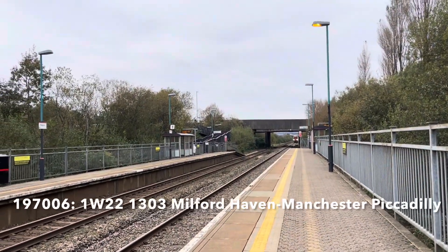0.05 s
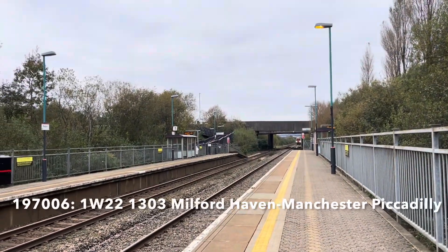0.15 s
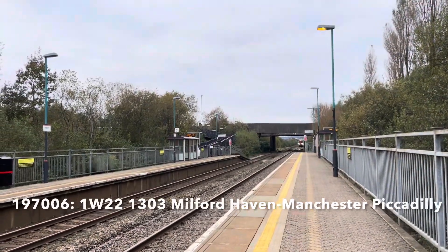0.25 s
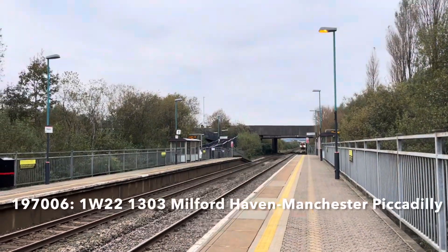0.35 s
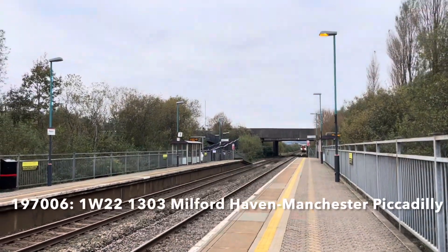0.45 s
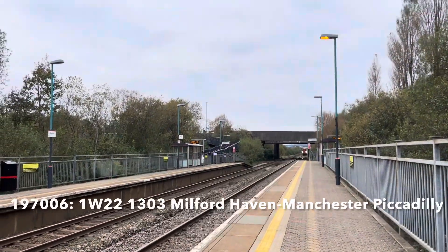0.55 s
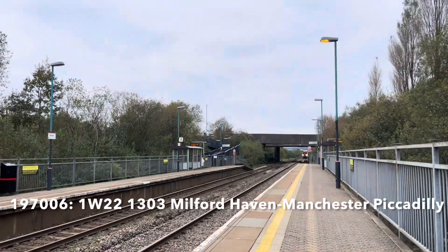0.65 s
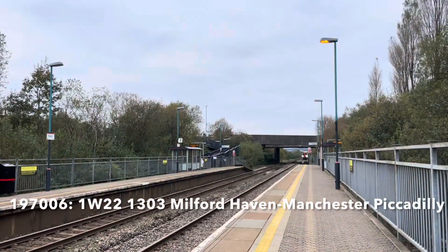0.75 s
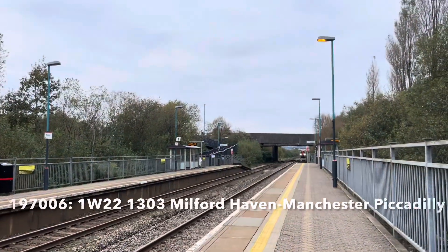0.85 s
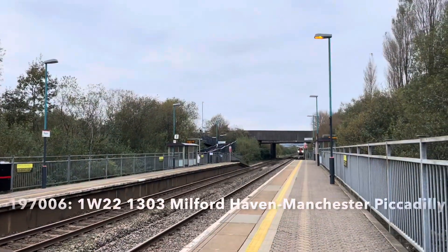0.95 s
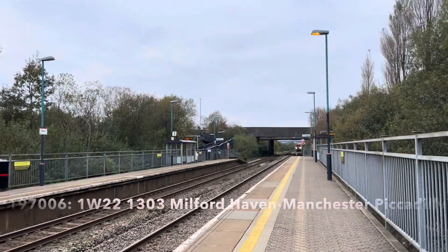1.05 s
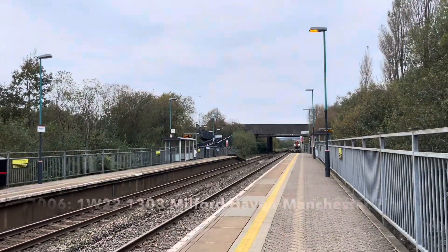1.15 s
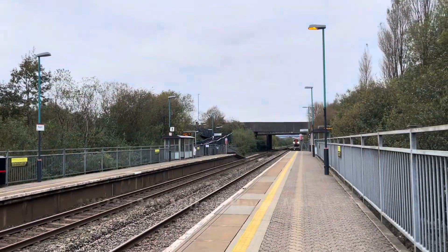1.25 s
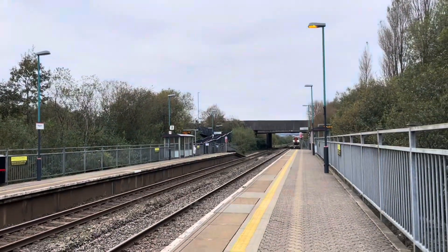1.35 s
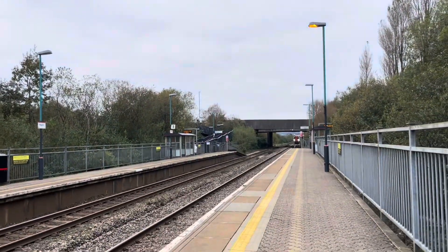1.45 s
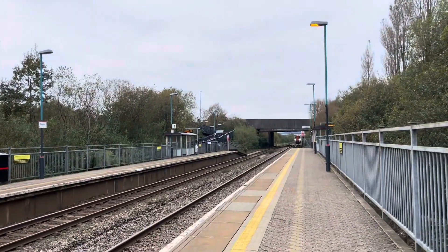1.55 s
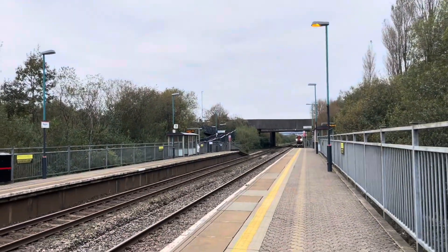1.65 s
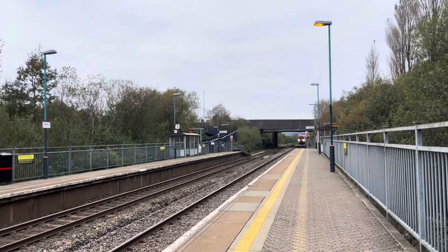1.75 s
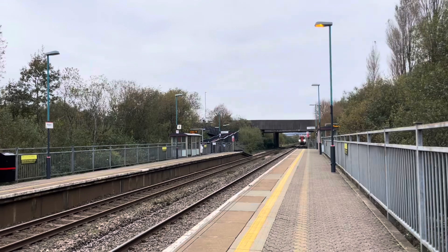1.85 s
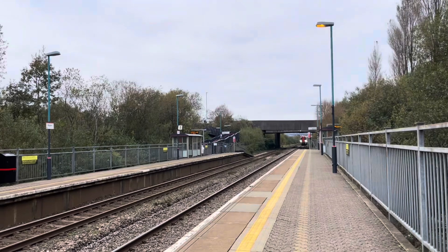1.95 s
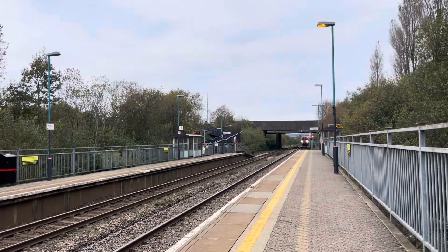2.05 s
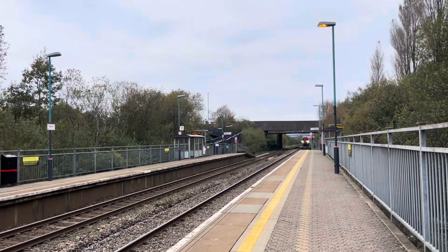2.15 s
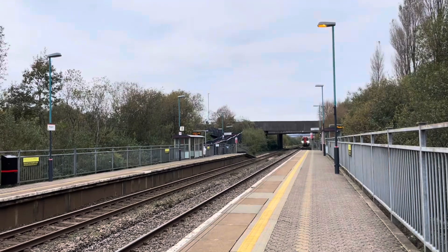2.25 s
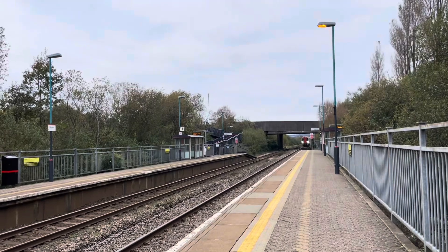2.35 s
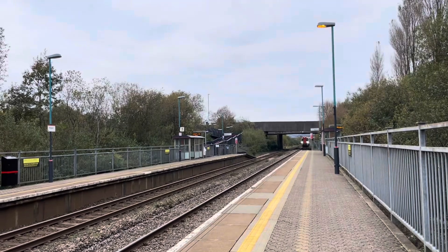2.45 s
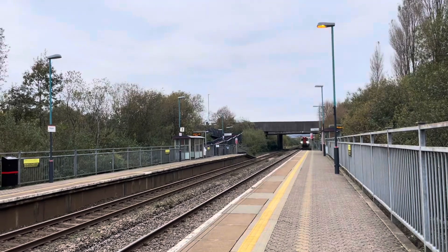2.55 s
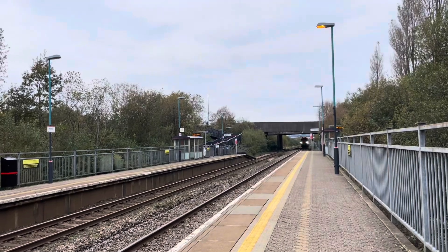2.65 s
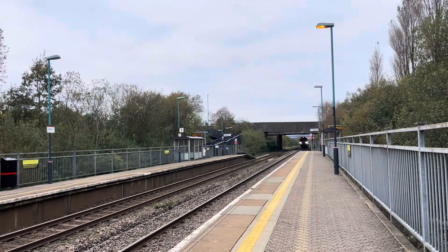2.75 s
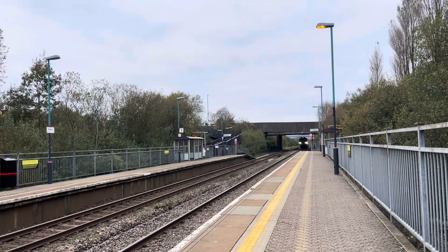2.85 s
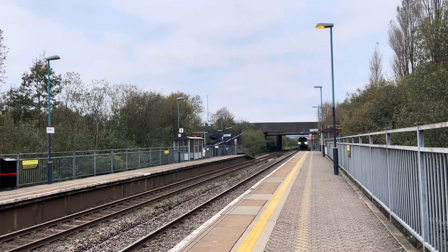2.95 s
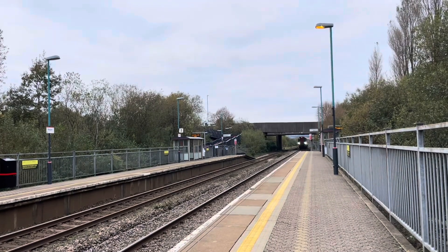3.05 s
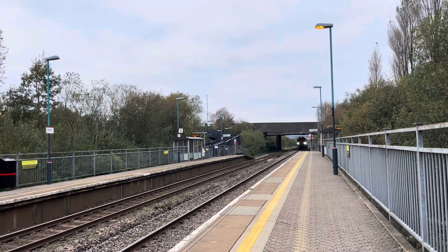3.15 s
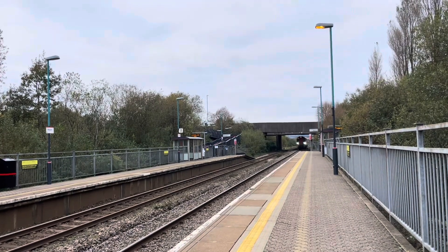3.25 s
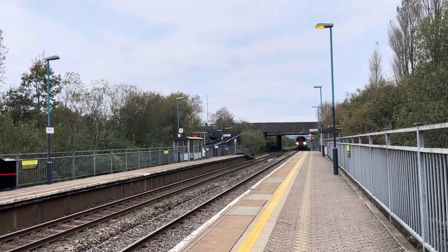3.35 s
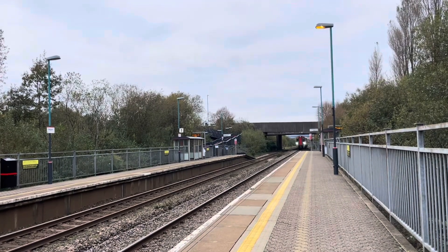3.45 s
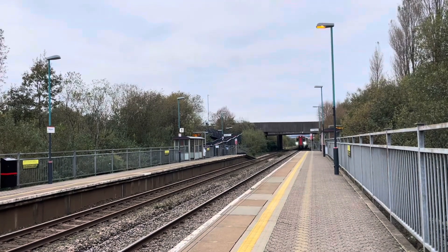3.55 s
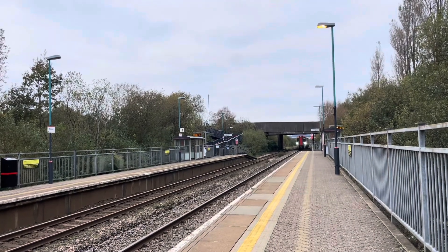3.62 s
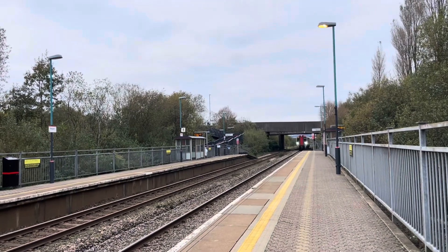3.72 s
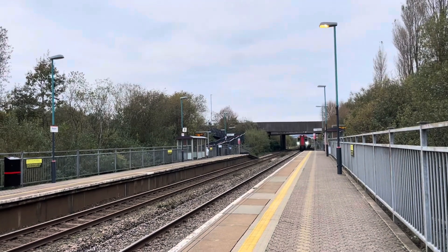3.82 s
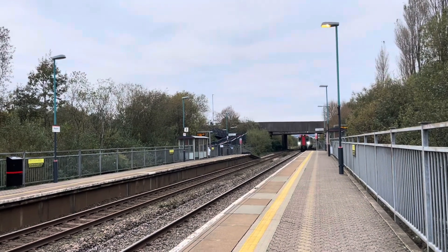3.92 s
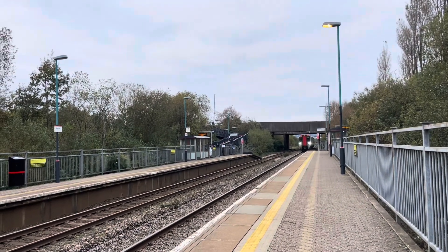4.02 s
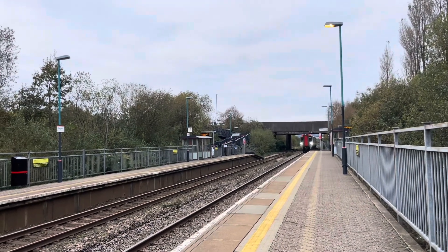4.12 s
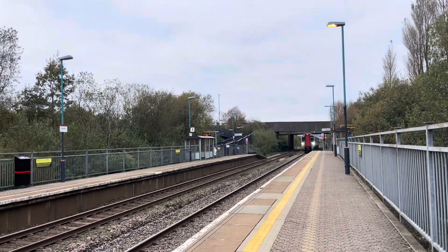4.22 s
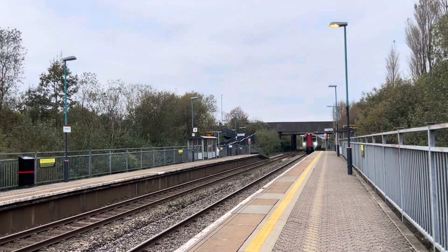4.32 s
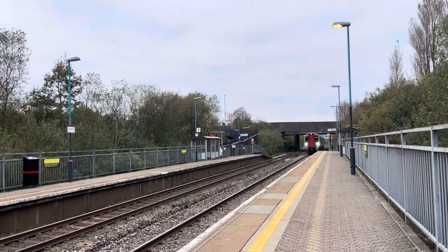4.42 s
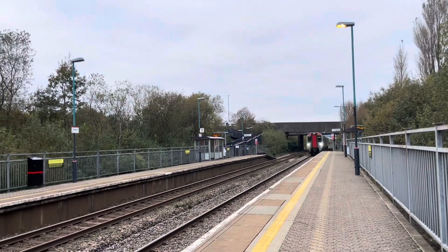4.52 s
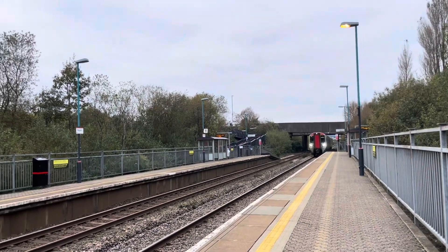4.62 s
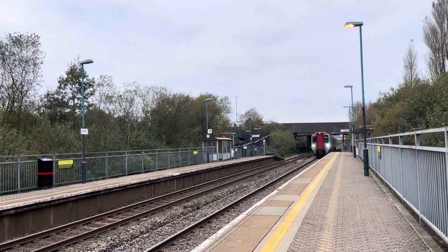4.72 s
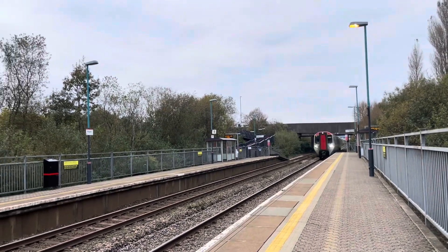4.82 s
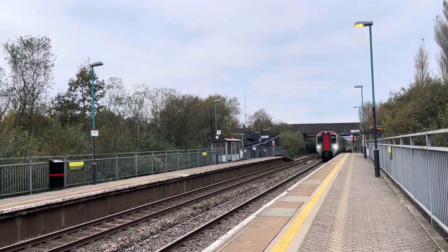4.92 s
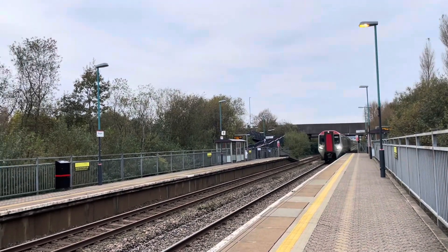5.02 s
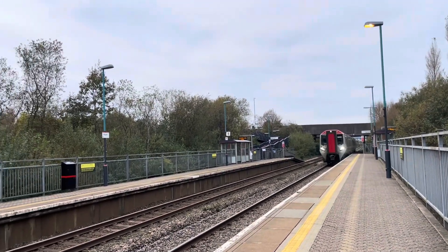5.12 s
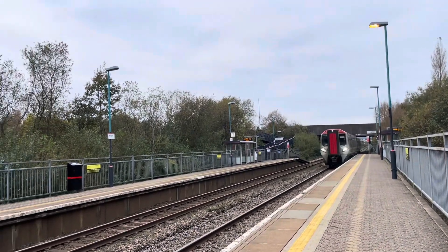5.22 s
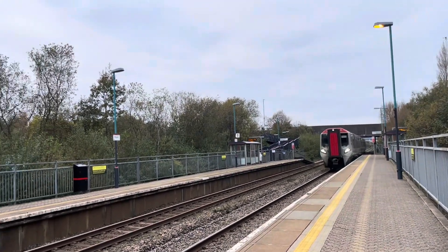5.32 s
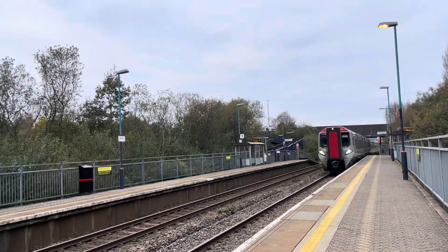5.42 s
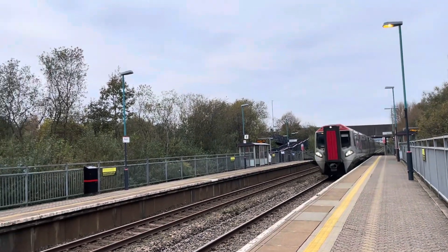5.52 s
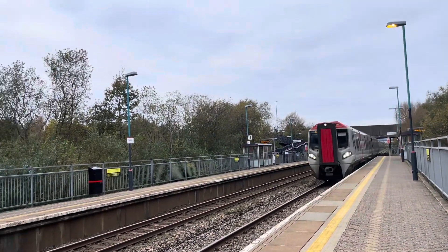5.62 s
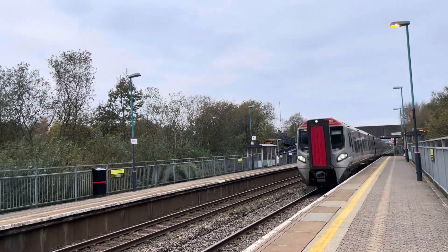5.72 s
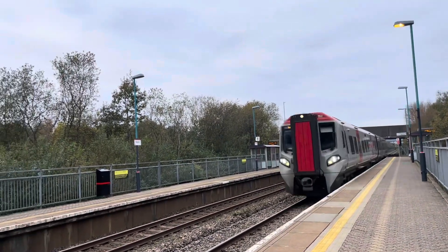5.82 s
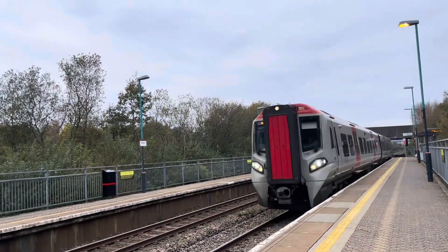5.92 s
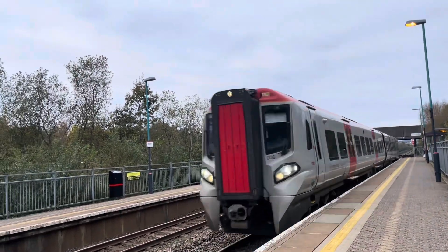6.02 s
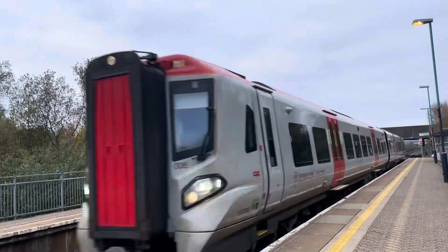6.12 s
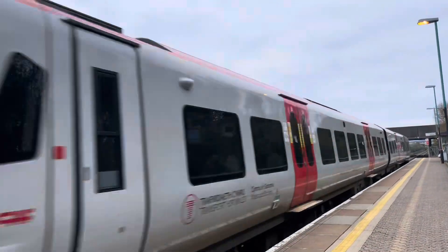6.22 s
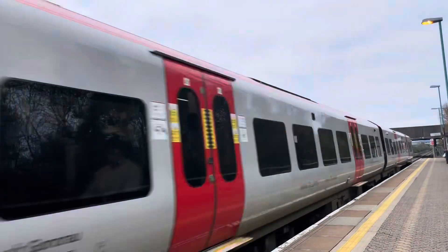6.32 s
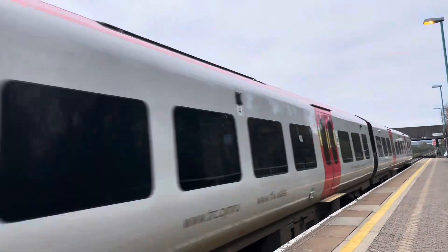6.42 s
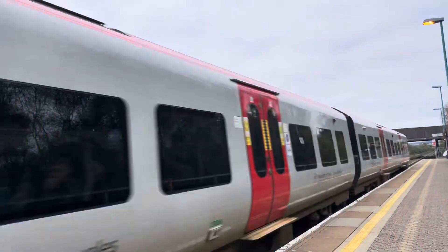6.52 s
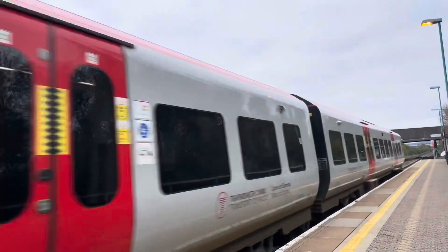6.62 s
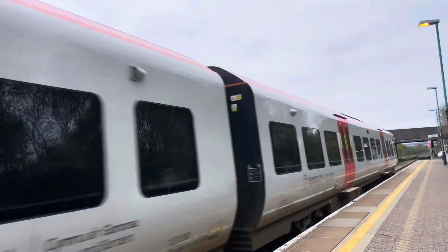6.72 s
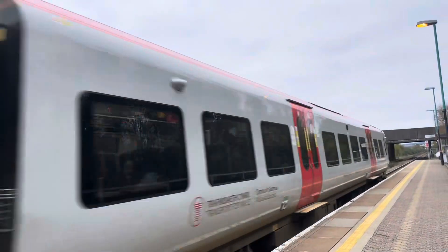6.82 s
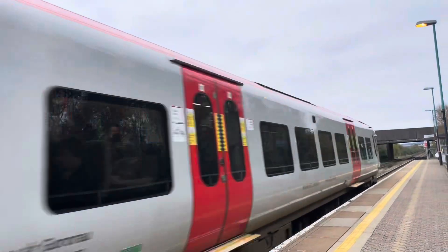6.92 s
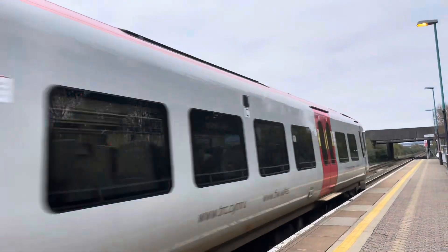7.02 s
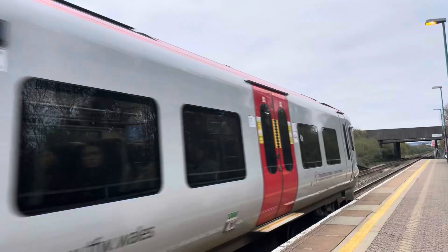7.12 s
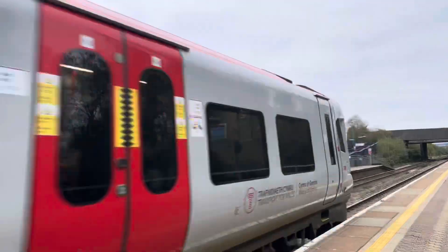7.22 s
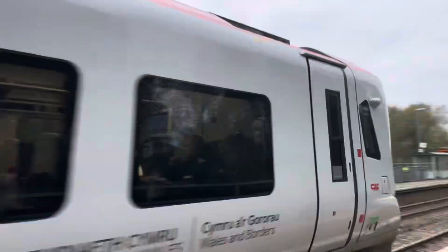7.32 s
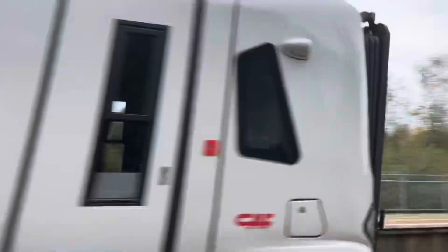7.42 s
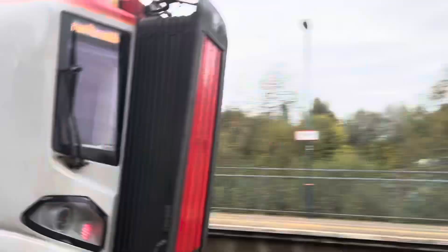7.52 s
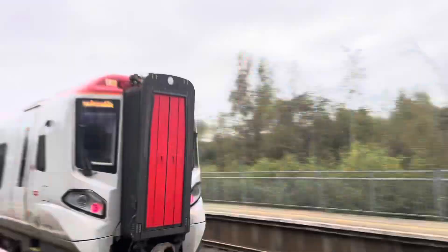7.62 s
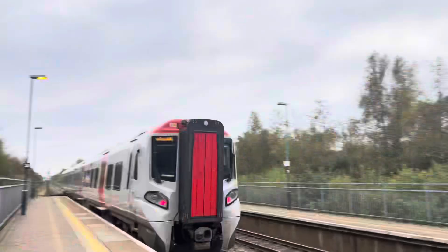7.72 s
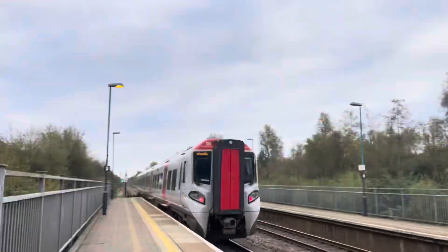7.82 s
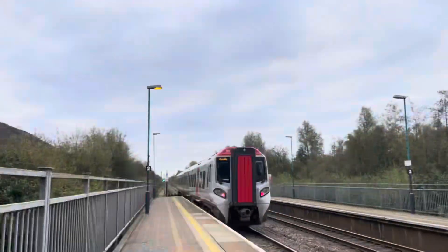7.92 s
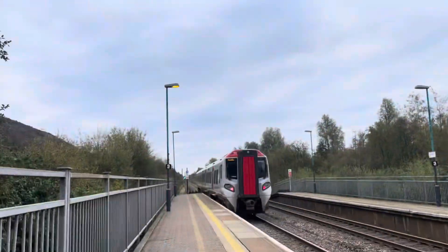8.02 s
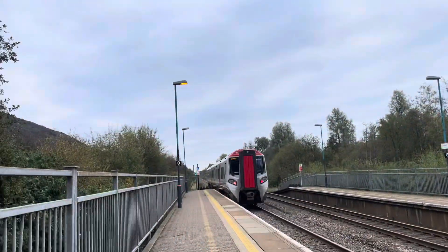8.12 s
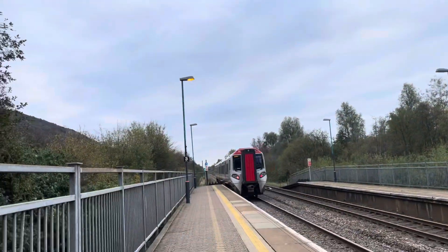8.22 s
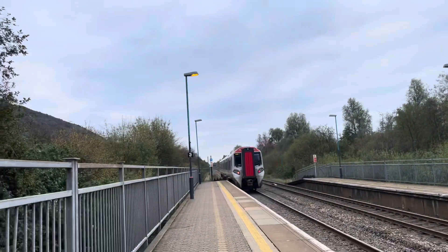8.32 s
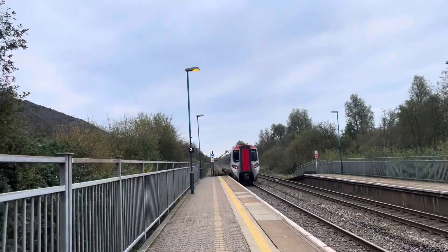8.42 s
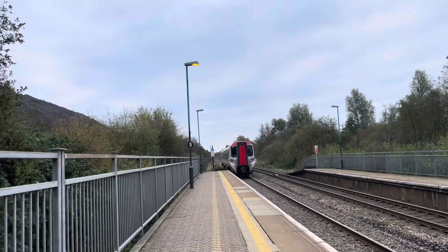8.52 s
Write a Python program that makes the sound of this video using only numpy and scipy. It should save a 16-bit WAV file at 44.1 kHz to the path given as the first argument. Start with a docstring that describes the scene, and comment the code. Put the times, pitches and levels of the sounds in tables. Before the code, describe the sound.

A faint engine drone and gentle gusts hold the opening, with a quick double tap close to the microphone. Track hum and thin steely hiss slowly grow before a blast of pushed air marks the train's nose. Broad wheel roar, scrape, engine throb and sliding metallic whines fill the wide stereo image, followed by rapid hollow knocks and a rough, much quieter departing rumble.

```python
"""A two-car diesel train runs through a country station at speed, a few metres from the listener.
Shaped noises swell and fade as rails, bogies and pushed air; resonant noises are ringing steel and track.
Harmonics and sines, falling in pitch on the way past, are engines, fans and whines; turbochargers whistle.
Flat spots on the last wheels thump the rail. Behind it all: gusts, a distant rush in trees, two small taps."""
import sys
import numpy as np
from scipy import signal
from scipy.fft import rfft, irfft, next_fast_len
from scipy.io import wavfile
from scipy.ndimage import uniform_filter1d, map_coordinates

SR = 44100
rng = np.random.default_rng(int(sys.argv[2]) if len(sys.argv) > 2 else 0)


def int16_out(signal):
    """Quantize to a 16-bit WAV file."""
    q = np.round(np.clip(np.atleast_2d(signal).T, -1, 1) * 32767)
    wavfile.write(sys.argv[1], SR, q.astype(np.int16))


N = 377446
T = np.arange(N) / SR

# The four bogies. Each row: time abreast in seconds, then levels in dB of roar, rolling, scrape, hiss
# and wheel ring.
BOGIES = [(6.21, -16, -19.2, -28.5, -31, -35.5), (6.71, -20, -16.5, -33, -31.5, -33),
          (6.93, -21.5, -18.5, -30, -32, -35.5), (7.38, -19.3, -22.8, -31.5, -33.5, -38)]
# Spectrum of hissing air and steel. Each row: frequency in Hz, relative density in dB per Hz.
HISS_SPECTRUM = [(1500, -30), (3000, 0), (3800, 1), (4400, 0), (5250, 3), (5700, -1), (7300, -1),
                 (8300, -2), (9400, 1), (11200, 0), (12600, -3.5), (13900, -14), (15500, -32)]
# How the two microphone ports hear a far and a close source. Each row: frequency in Hz, likeness 0-1,
# left lead in rad.
FAR = [(60, 0.94, 0), (274, 0.92, 0.36), (500, 0.83, 1), (860, 0.5, 1.57), (1554, 0.2, -0.75), (1850, 0, 5),
       (2180, 0.74, 5.5), (4860, 0.8, 5.5), (5390, 0.2, 9), (5530, .4, 3.5), (6550, 0.3, 7), (7040, 1, 4.5)]
NEAR = [(58, 0.76, 0.57), (230, 0.82, 0.25), (504, 0.3, 0.03), (860, 0.62, 2.12), (1540, 0.68, 4.05),
        (2100, 0.68, 6.6), (2970, 0.23, 6.3), (4160, 1, 7.8), (5430, 0.4, 5.2), (5750, .4, 4.4),
        (6440, 0.57, 6.2), (7240, 1, 4.47)]

SPEED_M_PER_S, SOUND_M_PER_S = 34.6, 343


def amp(db):
    """Decibels to gain."""
    return 10 ** (np.asarray(db) / 20)


def unit(x):
    """Scale so that the mean of the channels has rms 1."""
    return x / np.sqrt(np.mean(np.atleast_2d(x).mean(0) ** 2) + 1e-20)


def along(points, hz):
    """Each column of a table read on a log-frequency axis."""
    f, *cols = np.transpose(points)
    return [np.interp(np.log(hz + 1), np.log(f + 1), c) for c in cols]


def curves(rows):
    """One value per sample for each column after the time."""
    s, *cols = np.transpose(rows)
    return [np.interp(T, s, c) for c in cols]


def wobble(rate):
    """A smooth random curve, rate knots a second."""
    knots = rng.standard_normal(int(N * rate / SR) + 4)
    return map_coordinates(knots, [T * rate])


def plateau(start, end, edge):
    """1 from start to end, with straight ramps on either side."""
    return np.clip(1 + np.minimum(T - start, end - T) / edge, 0, 1)


def filtered(x, response):
    """x times a complex response of frequency."""
    m = next_fast_len(N + 8192, True)
    return irfft(rfft(x, m) * response(np.fft.rfftfreq(m, 1 / SR)), m)[..., :N]


def noise(spectrum):
    """Two unrelated noises of one colour."""
    return filtered(rng.standard_normal((2, N)), lambda hz: amp(along(spectrum, hz)[0]))


def ringing(modes):
    """Two unrelated noises that ring in a set of resonances."""
    def gain(hz):
        return sum(amp(db) / (1 + ((hz - centre) / width) ** 2 * 2) for centre, width, db in modes)
    return filtered(rng.standard_normal((2, N)), gain)


def ports(pair, table):
    """Mix a direct and a diffuse signal into left and right, with the phase between the ports."""
    # Top octave, shared by all sources. Each row: frequency in Hz, likeness 0-1, left lead in rad.
    treble = [(7800, .97, 3.3), (8900, 1, 3.1), (9600, .8, 2.7), (11300, .72, 1.5), (13000, .97, 0)]
    m = next_fast_len(N + 8192, True)
    alike, lead = along(table + treble, np.fft.rfftfreq(m, 1 / SR))
    alike = np.clip(alike, 0, 1)
    direct, diffuse = rfft(pair, m) * np.sqrt([(1 + alike) / 2, (1 - alike) / 2])
    shift = np.exp(.5j * lead)
    return irfft(np.array([(direct + diffuse) * shift, (direct - diffuse) / shift]), m)[:, :N]


def moving(spectrum, lean_db):
    """Stereo noise of rms about 1: narrow and off to one side from afar, wide while the train is alongside."""
    nose_s, tail_s, widen_s = 6.25, 7.45, 0.33
    close = plateau(nose_s, tail_s, widen_s)
    pair = noise(spectrum)
    far = amp(lean_db * np.array([[.5], [-.5]])) * unit(ports(pair, FAR))
    near = unit(ports(pair[:, ::-1], NEAR))
    return np.sqrt(1 - close) * far + np.sqrt(close) * near


def sweep(times, levels_db, reach):
    """Level in dB of sources that run past: each swells with nearness and is weaker once it has gone by."""
    metres, power, loss_db, past_db, screen_db, floor_db = reach
    past_m = 14.5  # a source turns its back over this stretch of track
    beyond = SPEED_M_PER_S * (T[::64] - np.array(times)[:, None])
    r = np.hypot(beyond, metres)
    each_db = np.array(levels_db)[:, None] - loss_db * r + past_db * np.clip(beyond / past_m, 0, 1)
    energy = np.sum((amp(each_db) * (metres / r) ** power) ** 2, axis=0) + amp(floor_db) ** 2
    # the car sides hide the wheels behind the platform edge
    screened = plateau(6.35, 7.15, edge=0.025)
    return np.interp(T, T[::64], 10 * np.log10(energy)) + screen_db * screened


def passing(abreast, metres):
    """The source's own time (Doppler) and its 1 / r gain as it runs past at a given distance."""
    r = np.hypot(SPEED_M_PER_S * (T - abreast), metres)
    return T - (r - metres) / SOUND_M_PER_S, metres / r


def carried(pair, abreast, metres, power):
    """A sideways-radiating noise carried past on the train, faintly heard from behind."""
    own_time, gain = passing(abreast, metres)
    behind = np.interp(T, [7.6, 8.2], [0, .05])
    shifted = np.array([np.interp(own_time, T, row) for row in unit(pair)])
    return (gain ** power + behind) * shifted


def orders(turns, table):
    """Harmonics of a rotation, each with its own unsteady strength."""
    return sum(amp(db + 2.3 * wobble(9)) * np.sin(2 * np.pi * (k * turns + rng.random())) for k, db in table)


def patchy(x, depth_db):
    """Let narrow resonances come and go at random across a noise."""
    smooth_below_hz = 600  # the low roar swells more evenly than the ringing above it
    z = signal.stft(x, nperseg=2048)[2]
    field = signal.convolve2d(rng.standard_normal(z.shape[1:]), np.ones((3, 4)), "same")
    hz = np.linspace(0, SR / 2, len(field))[:, None]
    gain = amp(depth_db * np.minimum(hz / smooth_below_hz, 1) * field / field.std())
    return signal.istft(z * gain / np.sqrt(np.mean(gain ** 2)), nperseg=2048)[1][:, :N]


def rails():
    """The rails carry the wheels' vibration far ahead and sing in a few high bands."""
    # Each row: time in seconds, level in dB before a 2 dB lift.
    song_level = [(0, -79), (1.2, -78), (2.1, -71), (3.1, -61), (4, -58.5), (5, -53), (6.2, -45.5),
                  (7.5, -64), (8.56, -54)]
    # Each row: frequency in Hz, width in Hz, relative level in dB.
    rail_modes = [(4000, 1330, -4.5), (7120, 180, -2), (11440, 150, 2.5), (12900, 790, -10.5)]
    return amp(curves(song_level)[0] + 2.0) * unit(ports(ringing(rail_modes), FAR))


def track():
    """The track hums far ahead of the train and rings brighter just before and behind the wheels."""
    # Hum, rail ring ahead, ring at the wheels. Each row: frequency in Hz, width in Hz, relative dB.
    hum_modes = [(492, 77, 1.5), (590, 51, 0.5), (793, 180, -1), (1090, 130, -6.5), (1470, 180, -14.5)]
    ahead_modes = [(1070, 90, 2), (1237, 120, 1.5), (1454, 110, -4)]
    close_modes = [(630, 94, -3), (785, 133, 2.5), (940, 69, -5.5), (1280, 110, -8.5)]
    # Their levels. Each row: time in seconds, level in dB.
    hum_level = [(0, -51), (2.2, -58), (2.6, -45.5), (3.5, -44), (4, -39.5), (4.6, -34.5), (5.2, -39),
                 (6, -41), (6.5, -60)]
    ahead_level = [(4.3, -58.5), (4.75, -41.5), (5.15, -39.5), (5.38, -45), (5.65, -36.5), (5.96, -28.5),
                   (6.1, -43), (6.3, -70)]
    close_level = [(4, -47.5), (5.5, -37), (5.85, -28.5), (6.17, -19.5), (6.4, -45), (7.15, -39),
                   (7.4, -30), (7.7, -30.5), (8, -39.5), (8.56, -46)]
    hum = amp(curves(hum_level)[0] + 1.04 * wobble(18)) * unit(ports(ringing(hum_modes), FAR))
    ahead = amp(curves(ahead_level)[0] + 1.2 * wobble(25)) * unit(ports(ringing(ahead_modes), FAR))
    close = amp(curves(close_level)[0] + 2.2 * wobble(35)) * unit(ports(ringing(close_modes), FAR))
    return hum + ahead + close


def engines():
    """A faint far exhaust drone, then each car's diesel throbbing past in harmonics of its firing rate."""
    # Far drone. Each row: time in seconds, level in dB.
    drone_level = [(0, -45.5), (1.8, -55.5), (2.4, -42), (4, -56), (5, -41), (5.6, -33), (6, -42)]
    # Each row: time abreast in seconds, level in dB.
    engine_passes = [(6.299, -16.5), (6.759, -10.5)]
    # Each row: multiple of the firing rate, relative level in dB.
    firing_orders = [(1, -3), (2, -23), (3, -13), (4, -18), (5, -16.5)]
    far_hz, near_hz = 73.3, 75  # firing rates; the near one before Doppler
    far_turns = np.cumsum(far_hz + 0.36 * wobble(8)) / SR
    out = amp(curves(drone_level)[0]) * orders(far_turns, [(2, -1.3), (3, -0.76)])
    for abreast, db in engine_passes:
        own_time, gain = passing(abreast, metres=5.0)
        out += amp(db) * gain ** 2 * orders(near_hz * own_time + 0.046 * wobble(25), firing_orders)
    return out


def trees():
    """A far rush of wind in the trees: coloured noise of unsteady level."""
    # Each row: frequency in Hz, relative density in dB per Hz.
    rush_spectrum = [(100, -31), (350, -9.5), (530, -0.5), (720, -4), (980, 3.5), (1300, -9.5), (1800, -7),
                     (2500, -35), (4500, -35), (9000, -74)]
    # Each row: time in seconds, level in dB.
    rush_level = [(0, -48), (.5, -42.5), (1.4, -43), (2.4, -43.5)]
    level = amp(curves(rush_level)[0] + 0.48 * wobble(1.5) + .6 * wobble(9.2))
    return level * unit(ports(noise(rush_spectrum), FAR))


def wind():
    """Low buffeting from gusts of the breeze, swelling with the train's pressure waves."""
    # Each row: frequency in Hz, relative density in dB per Hz.
    buffet_spectrum = [(15, -34), (30, -19), (42, -11), (53, 2.5), (75, -4), (100, -16.5), (200, -27),
                       (600, -79), (2000, -120)]
    # Each row: time in seconds, half length in seconds, level in dB.
    gust_rows = [(.16, 0.11, -37.5), (0.625, 0.19, -34), (1.5, 0.33, -32.5), (2.404, 0.31, -37.5),
                 (3.14, 0.29, -33), (3.547, 0.08, -33.5), (3.943, 0.066, -31), (4.39, 0.054, -31),
                 (5.1, 0.65, -33.5), (8.35, 0.17, -33.5)]
    # Pressure waves of nose, coupling and wake. Each row: time abreast in seconds, level in dB.
    air_waves = [(6.28, -17.5), (6.72, -21.5), (7.6, -25.5)]
    # Their carry, in order: distance in m, power of 1 / r, loss in dB per m, dB once past,
    # dB when screened, floor in dB.
    air_reach = (3.5, 0.17, 0.34, -4.5, -4.5, -53)
    calm_db = -39  # between gusts
    breeze = amp(calm_db) ** 2
    breeze = breeze + sum(amp(db) ** 2 * np.exp(-((T - s) / length) ** 2) for s, length, db in gust_rows)
    strength = np.sqrt(breeze + amp(sweep(*np.transpose(air_waves), air_reach)) ** 2)
    buffeting = ports(noise(buffet_spectrum), FAR)
    # quarter-second rms, to even out the noise before the gusts shape it
    pressure = np.sqrt(np.abs(uniform_filter1d(buffeting.mean(0) ** 2, SR // 4)) + 1e-12)
    return strength * buffeting / pressure


def taps():
    """Each small tap close by is a faint dull tick and a short plop that drops in pitch."""
    # Each row: start in seconds, plop level in dB, tick level in dB.
    tap_rows = [(0.379, -25, -43), (0.405, -26, -27.5)]
    # Each row: frequency in Hz, relative density in dB per Hz.
    tick_spectrum = [(200, -10), (1200, 0), (2300, -6), (3100, -21), (4500, -25), (6000, -43), (10000, -68)]
    out = np.zeros(N)
    tick = unit(noise(tick_spectrum)[0])
    for s, plop_db, tick_db in tap_rows:
        age = np.maximum(T - s, 0)
        plop = np.sin(2 * np.pi * (350 * age + 2.27 * (1 - np.exp(-age / 0.0037))))
        onset = 1 - np.exp(-(age / .0006) ** 2)
        plop_gain = amp(plop_db - 60 * age / 0.04)
        tick_gain = amp(tick_db - 60 * age / 0.011)
        out += onset * (plop * plop_gain + tick * tick_gain)
    return out


def rolling():
    """Wheels on rough rail: an underbody roar, the rolling band, a scrape and a hiss of air and steel."""
    # Each row: frequency in Hz, relative density in dB per Hz.
    roar_spectrum = [(40, -50), (75, -1), (110, 0), (160, -1), (250, -4), (340, -6.5), (480, -18.5),
                     (1000, -43), (3000, -120)]
    roll_spectrum = [(150, -33), (330, -8.5), (450, 0.5), (650, 1.5), (900, -3.5), (1200, -7.5),
                     (1600, -16.5), (2400, -24), (5000, -84), (9000, -120)]
    scrape_spectrum = [(700, -11), (1400, 3), (1900, 1), (2500, -1.5), (3300, -8.5), (4500, -19),
                       (6500, -19.5), (15000, -68)]
    # How each carries, in order: distance in m, power of 1 / r, loss in dB per m, dB once past,
    # dB when screened by the cars, floor in dB.
    roar_reach = (1, 0.1, 0.265, -7, 0, -43)
    roll_reach = (4, 0.69, 0.12, -2.5, -5, -45)
    scrape_reach = (4, 0.38, 0.1154, -9, -2.5, -59.5)
    hiss_reach = (3.5, 0.56, 0.23, -4.5, -1, -97)
    abreast, roar_db, roll_db, scrape_db, hiss_db, _ = np.transpose(BOGIES)
    roar_level = amp(sweep(abreast, roar_db, roar_reach) + 0.67 * wobble(22))
    roll_level = amp(sweep(abreast, roll_db, roll_reach) + 0.75 * wobble(40))
    scrape_level = amp(sweep(abreast, scrape_db, scrape_reach) + 0.79 * wobble(25))
    hiss_level = amp(sweep(abreast, hiss_db, hiss_reach) + 0.71 * wobble(25))
    roar = roar_level * moving(roar_spectrum, lean_db=-2.5)
    roll = roll_level * moving(roll_spectrum, lean_db=-2.0)
    scrape = scrape_level * moving(scrape_spectrum, lean_db=-1.3)
    hiss = hiss_level * moving(HISS_SPECTRUM, lean_db=-1.5)
    return roar + roll + scrape + hiss


def bow_blast():
    """Air pushed aside by the nose swells into a dense rush, tipped with hiss, and breaks off."""
    # Each row: frequency in Hz, relative density in dB per Hz.
    bow_spectrum = [(40, -25), (100, -4), (200, -5), (330, 4.5), (480, -4.5), (800, -10), (1300, -18),
                    (2200, -24), (5000, -39), (12000, -80)]
    peak_s, rush_rise_s, hiss_rise_s, fall_s = 6.312, 0.21, 0.039, 0.022
    rush_db, hiss_db = -14.5, -29.5

    def swell(rise_s):
        return np.exp(np.minimum((T - peak_s) / rise_s, (peak_s - T) / fall_s))

    rush = amp(rush_db) * swell(rush_rise_s) * unit(ports(noise(bow_spectrum), NEAR))
    return rush + amp(hiss_db) * swell(hiss_rise_s) * unit(ports(noise(HISS_SPECTRUM), NEAR))


def wheels():
    """The wheels of each bogie ring fitfully in a few modes that drop in pitch as they pass."""
    # Each row: frequency in Hz, width in Hz, relative level in dB.
    wheel_modes = [(995, 68, 4), (1592, 81, -4), (1970, 170, 1.5), (2340, 250, -6)]
    ring = np.zeros((2, N))
    for abreast, *_, db in BOGIES:
        level = amp(db + 2.0 * wobble(20))
        ring += level * carried(ringing(wheel_modes), abreast, metres=4.6, power=1.4)
    return ports(ring, NEAR)


def streaks():
    """Narrow bands of wheel ring, noise on a falling carrier, swell and slide down in pitch in turn."""
    # Each row: time in seconds, half length in seconds, frequency in Hz, width in Hz, level in dB.
    streak_rows = [(6.179, 0.083, 2080, 129, -29), (6.369, 0.09, 1772, 190, -29.5),
                   (6.719, 0.064, 2250, 380, -29.5), (6.799, 0.088, 1605, 210, -29),
                   (6.909, .09, 2007, 190, -27.5), (7.06, .08, 1717, 180, -32),
                   (7.33, 0.055, 2350, 430, -30), (7.44, .06, 1900, 200, -32)]
    fall_per_s = .7  # share of its pitch that a band loses in a second
    out = np.zeros((2, N))
    for s, length, hz, width_hz, db in streak_rows:
        age = T - s
        carrier = np.exp(2j * np.pi * hz * (age - fall_per_s * age ** 2 / 2))
        near = np.abs(age) < 3 * length
        swell = amp(db) * np.exp(-(age[near] / length) ** 2)
        for row in out:
            knots = rng.standard_normal((2, 600))
            places = [300 + 2 * width_hz * age[near]]
            real, imag = [map_coordinates(k, places, mode="wrap") for k in knots]
            row[near] += swell * np.real((real + 1j * imag) * carrier[near])
    return ports(out, NEAR)


def whines():
    """Single wheel modes flare up as thin, wavering tones that slide down as they pass."""
    # Each row: time in seconds, half length in seconds, frequency in Hz, level in dB.
    whine_rows = [(6.17, .04, 1400, -26), (6.196, .03, 2030, -35), (6.328, 0.05, 1715, -35),
                  (6.80, 0.049, 1495, -27), (6.957, 0.026, 1956, -31), (7.17, 0.046, 1790, -30),
                  (7.403, 0.02, 1910, -30)]
    fall_per_s = 0.355  # share of its pitch that a whine loses in a second
    out = np.zeros((2, N))
    for s, length, hz, db in whine_rows:
        age = T - s
        turns = hz * (age - fall_per_s * age ** 2 / 2)
        swell = amp(db) * np.exp(-(age / length) ** 2)
        for row in out:
            row += swell * np.sin(2 * np.pi * (turns + 0.12 * wobble(90)))
    return ports(out, NEAR)


def fans():
    """Each cooler's blade tone falls in pitch as it passes, swelling and dipping as if two close tones beat."""
    # One list per car. Each row: time in seconds, frequency in Hz, level in dB before the trim.
    fan_cars = [
        [(6.24, 470, -34), (6.33, 476, -17), (6.385, 473, -26), (6.45, 467, -14.5), (6.52, 449, -10),
         (6.575, 436, -31), (6.615, 422, -12), (6.66, 412, -12), (6.705, 402, -28), (6.8, 386, -21),
         (6.88, 382, -36)],
        [(6.9, 456, -34), (6.955, 455, -18), (6.99, 458, -25), (7.065, 442, -15.5), (7.088, 425, -29),
         (7.12, 410, -17), (7.16, 404, -26), (7.2, 398, -38)],
    ]
    trim_db, flutter_turns, waver_db = -2, 0.045, 1.1
    out = np.zeros((2, N))
    for rows in fan_cars:
        hz, db = curves(rows)
        heard = plateau(rows[0][0], rows[-1][0], .04)
        turns = np.cumsum(hz) / SR + flutter_turns * wobble(45)
        level = heard * amp(trim_db + db + waver_db * wobble(25))
        direct = np.sin(2 * np.pi * turns)
        diffuse = np.cos(2 * np.pi * (turns + 0.13 * wobble(12)))
        out += level * np.array([direct, diffuse])
    return ports(out, NEAR)


def turbos():
    """Each turbocharger goes by as a brief, airy, falling whistle: noise in one broad resonance."""
    # Each row: time abreast in seconds, whistle frequency in Hz before Doppler, level in dB.
    turbo_rows = [(6.52, 12100, -40), (7.041, 10550, -34)]
    whistle = np.zeros((2, N))
    for abreast, hz, db in turbo_rows:
        air = ringing([(hz, 1200, 0)])
        whistle += amp(db) * carried(air, abreast, metres=2.0, power=1.7)
    return ports(whistle, NEAR)


def wheel_flats():
    """Each flat-spot blow: a heavy push that drops in pitch, a hollow knock, a low thud and a steely crack."""
    # Each row: start in seconds, levels in dB of knock, thud, crack and push (before doubling),
    # push frequency in Hz before a random spread.
    thump_rows = [(7.202, -28, -16, -40, -13, 80), (7.252, -20, -20, -36, -19, 215),
                  (7.309, -13, -26, -27, -21, 230), (7.358, -15, -16, -34, -14, 200),
                  (7.368, -9.5, -19, -30, -12.5, 240), (7.428, -6, -18, -24, -8.5, 200),
                  (7.492, -6.5, -15, -14.5, -9, 205), (7.540, -20, -15, -30, -11, 115),
                  (7.560, -11.5, -24, -32, -20, 230), (7.626, -17, -28, -31, -20, 180),
                  (7.680, -22, -21, -38, -17.5, 170), (7.750, -19, -26, -38, -25, 160),
                  (7.822, -22, -30, -38, -29, 190), (7.896, -19, -34, -32, -30, 200)]
    # Each row: frequency in Hz, relative density in dB per Hz.
    knock_spectrum = [(40, -20), (150, 0), (300, 4), (480, -14), (700, 1), (1020, 0), (1300, -35),
                      (1900, -19), (2800, -36), (5000, -35), (15000, -70)]
    thud_spectrum = [(30, -25), (70, 3), (110, -3), (230, 0), (400, -24), (1500, -80)]
    crack_spectrum = [(400, -20), (800, -2), (1050, -1), (1250, -9), (1450, 0), (1650, -7), (1870, 0),
                      (2300, -14), (5000, -27), (12000, -60)]
    knock_t60_s, thud_t60_s, crack_t60_s, attack_s = 0.077, .07, 0.048, 0.0039
    push_t60_s, push_attack_s = .075, .003
    bend_turns, bend_s = 1.2, .004  # the rail's flexing: extra turns at the start, their time
    knock, thud, crack, push = np.zeros((4, N))

    def fade(age, db, t60, attack):
        return (1 - np.exp(-age / attack)) * amp(db - 60 * age / t60)

    for s, knock_db, thud_db, crack_db, push_db, push_hz in thump_rows:
        span = slice(round(s * SR), round(s * SR) + SR // 4)
        age = T[span] - T[span][0]
        knock[span] += fade(age, knock_db, knock_t60_s, attack_s)
        thud[span] += fade(age, thud_db, thud_t60_s, attack_s)
        crack[span] += fade(age, crack_db, crack_t60_s, attack_s)
        turns = push_hz * np.exp(.06 * rng.normal()) * age + bend_turns * (1 - np.exp(-age / bend_s))
        push[span] += 2 * fade(age, push_db, push_t60_s, push_attack_s) * np.sin(2 * np.pi * turns)
    low = push + thud * unit(noise(thud_spectrum)[0])
    hollow = knock * unit(ports(noise(knock_spectrum), FAR))
    return low + hollow + crack * unit(ports(noise(crack_spectrum), FAR))


def wake():
    """Seen from behind, the departing train keeps up a rough rumble that pulses with each turn of the wheels."""
    # Each row: frequency in Hz, relative density in dB per Hz.
    wake_spectrum = [(50, -22), (120, -4), (165, 1), (215, -6), (280, -11), (390, 0.5), (520, -11.5),
                     (770, -2.5), (1000, -14), (1500, -20), (2500, -24), (6000, -56), (12000, -80)]
    # Each row: time in seconds, level in dB.
    wake_level = [(7.4, -60), (7.7, -38), (8.1, -37), (8.56, -33.5)]
    turns_per_s, beat_depth_db, beat_peak_s = 15, 2.5, 7.905
    beat_db = beat_depth_db * np.cos(2 * np.pi * (turns_per_s * (T - beat_peak_s) + .08 * wobble(8)))
    level = amp(curves(wake_level)[0] + beat_db + 2.2 * wobble(35))
    return level * unit(ports(noise(wake_spectrum), FAR)) * (T > wake_level[0][0])


def scene():
    """The train, the wind and the taps, heard from the platform."""
    rush = patchy(rolling() + trees() + rails(), depth_db=2.0)
    steel = track() + wheels() + streaks() + whines() + wheel_flats()
    machines = engines() + turbos() + fans()
    air = bow_blast() + wake() + wind()
    return rush + steel + machines + air + taps()


def record(dry):
    """The two microphone ports differ a little in colour; peaks are rounded off and the band is limited."""
    # Each row: frequency in Hz, left minus right in dB.
    tilt = [(60, -2.3), (125, -1.6), (250, .3), (500, .9), (1000, .6), (2000, 1.4), (4200, 2), (7500, 0)]
    top_hz = 15500
    heard = filtered(dry, lambda hz: amp(along(tilt, hz)[0] * np.array([[.5], [-.5]])))
    rounded = heard / (1 + np.abs(heard) ** 6) ** (1 / 6)
    return filtered(rounded, lambda hz: hz < top_hz)


dry = scene()
out = record(dry)
int16_out(out)
```